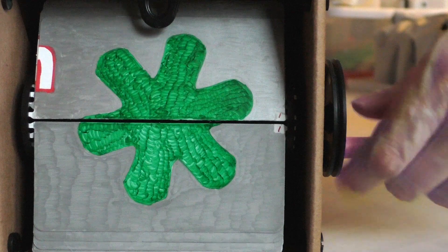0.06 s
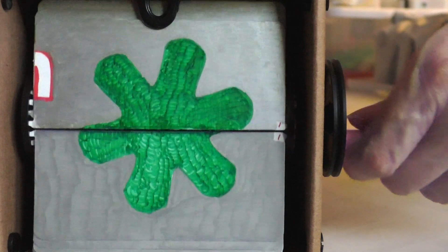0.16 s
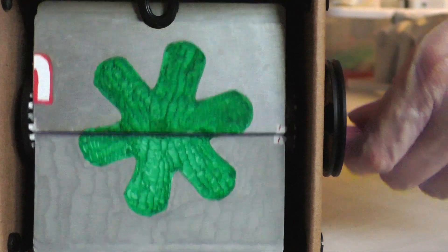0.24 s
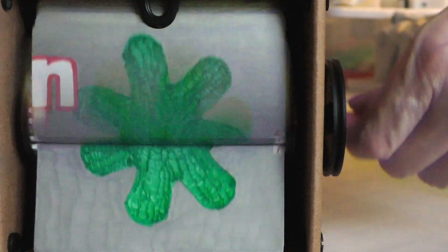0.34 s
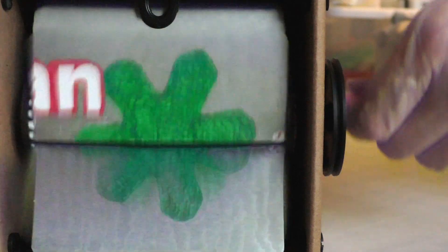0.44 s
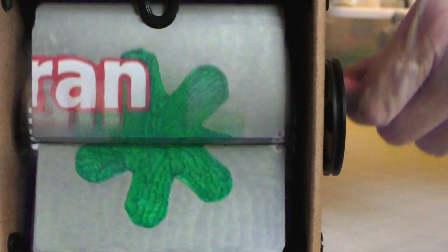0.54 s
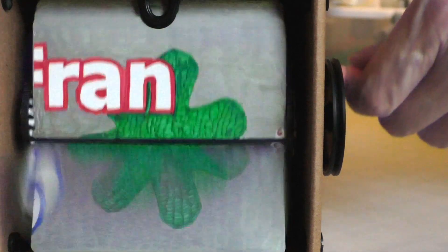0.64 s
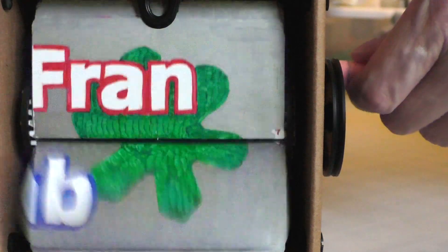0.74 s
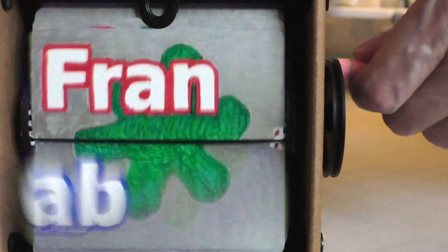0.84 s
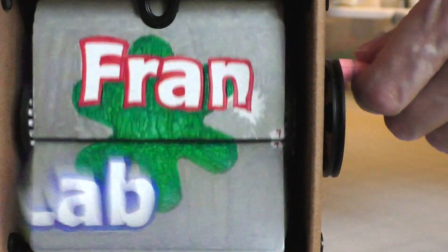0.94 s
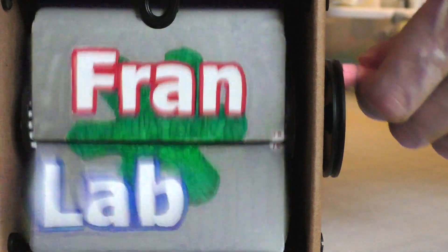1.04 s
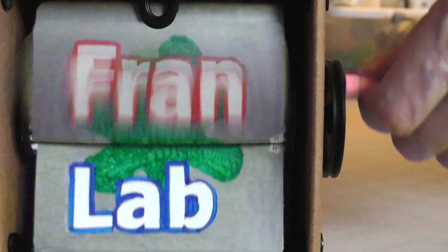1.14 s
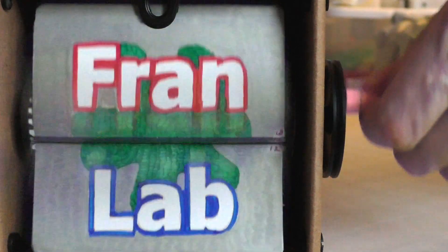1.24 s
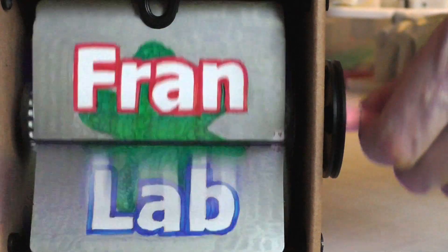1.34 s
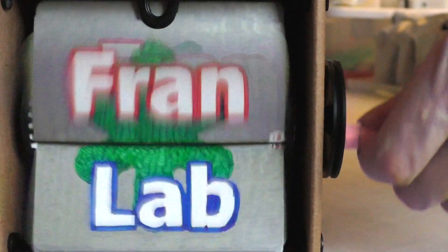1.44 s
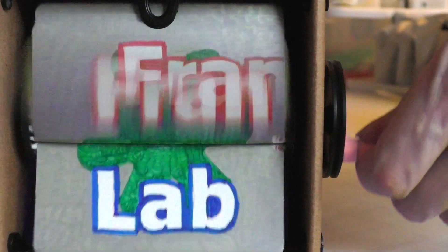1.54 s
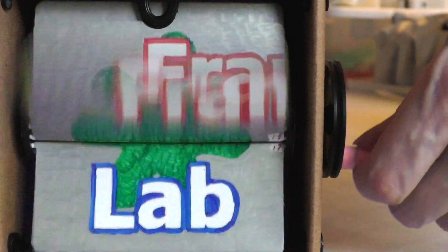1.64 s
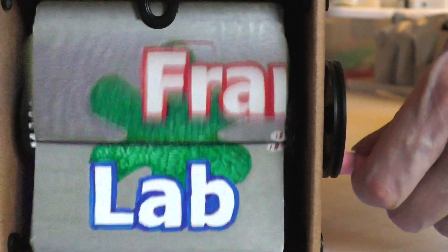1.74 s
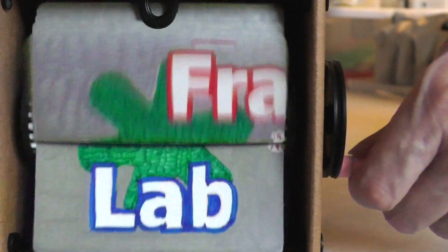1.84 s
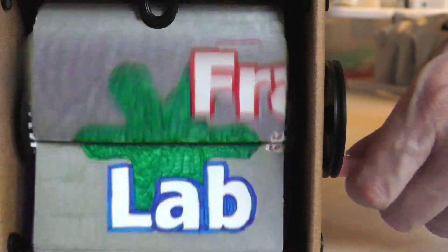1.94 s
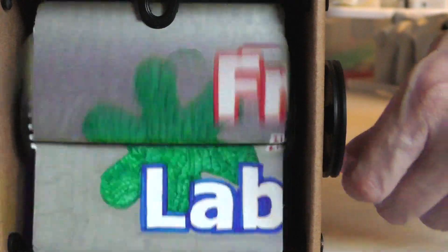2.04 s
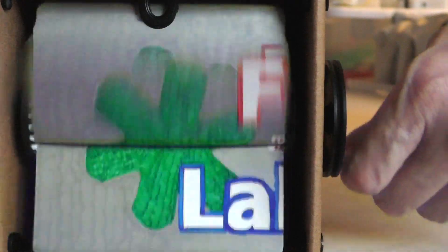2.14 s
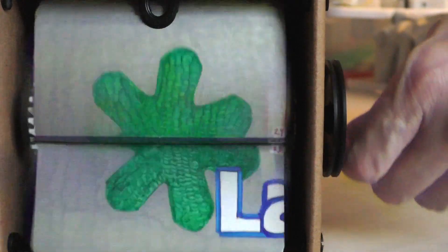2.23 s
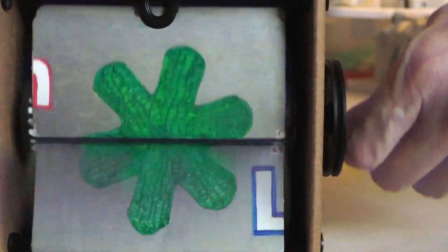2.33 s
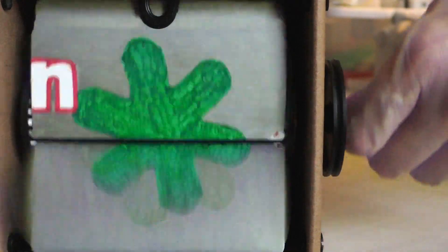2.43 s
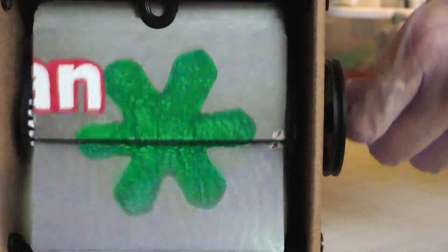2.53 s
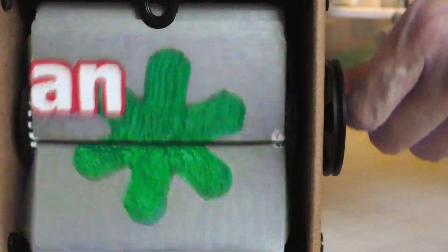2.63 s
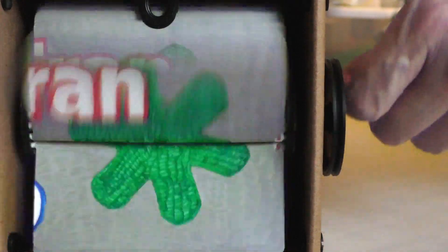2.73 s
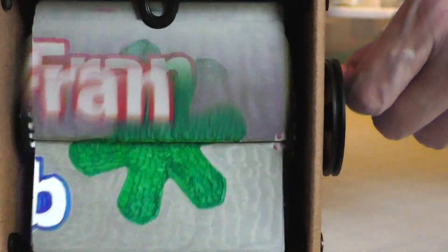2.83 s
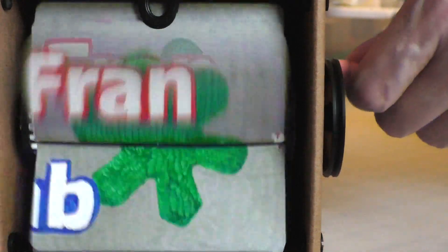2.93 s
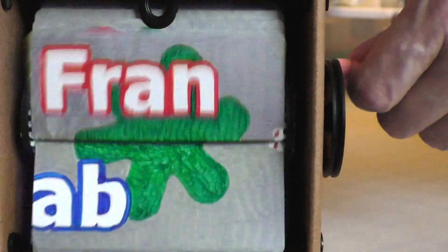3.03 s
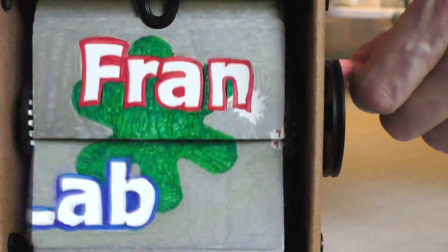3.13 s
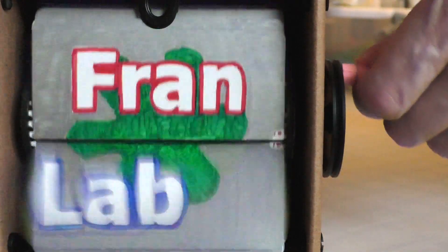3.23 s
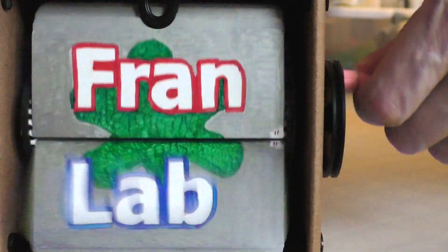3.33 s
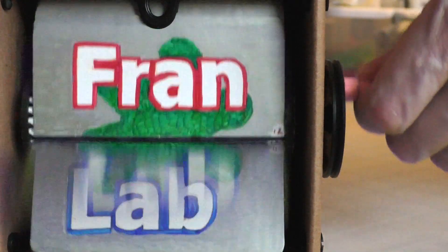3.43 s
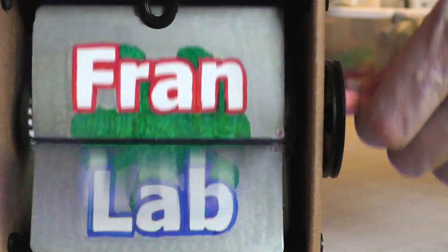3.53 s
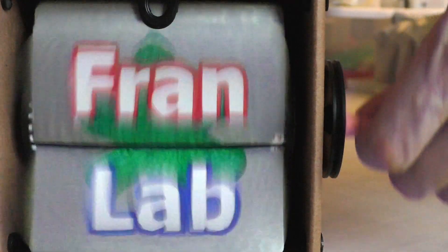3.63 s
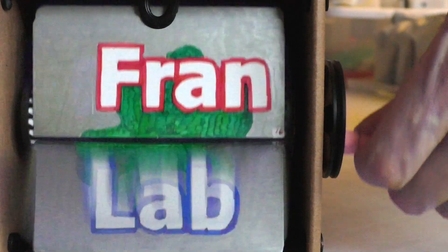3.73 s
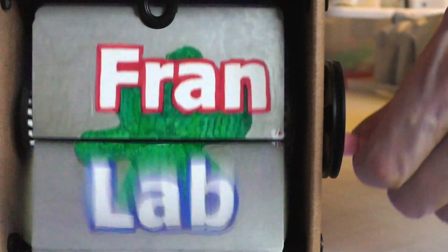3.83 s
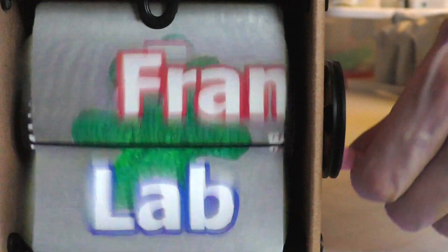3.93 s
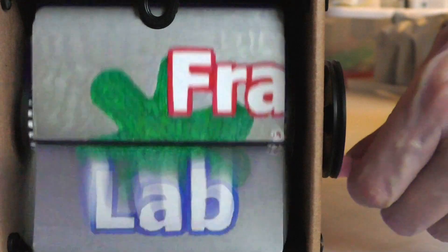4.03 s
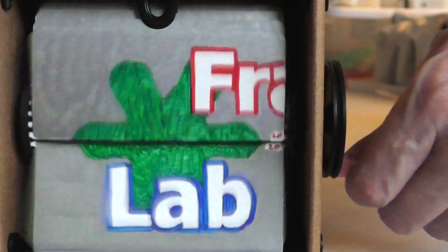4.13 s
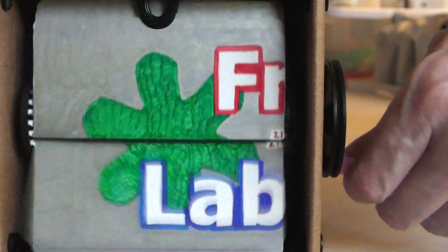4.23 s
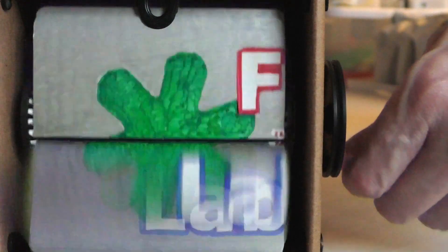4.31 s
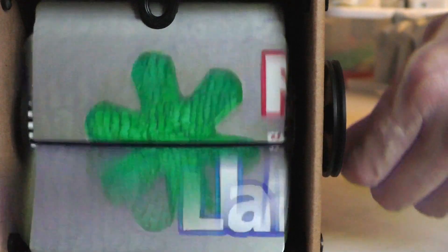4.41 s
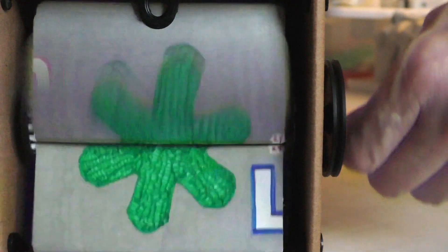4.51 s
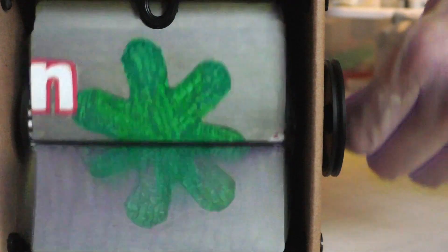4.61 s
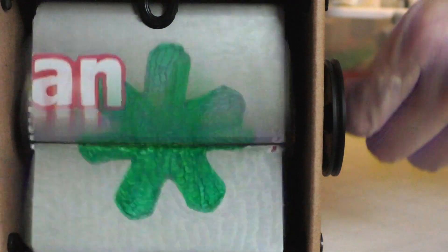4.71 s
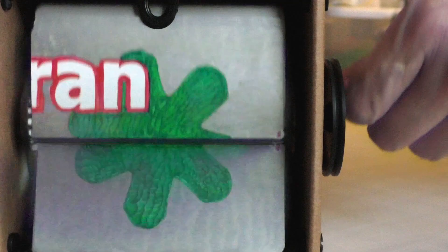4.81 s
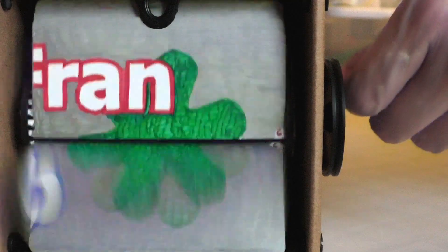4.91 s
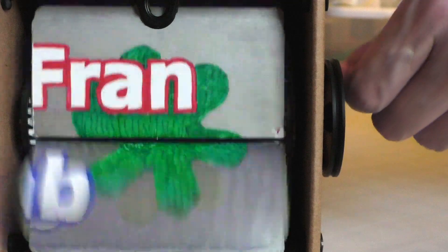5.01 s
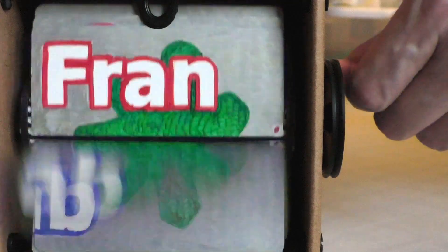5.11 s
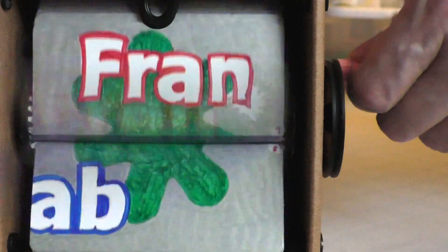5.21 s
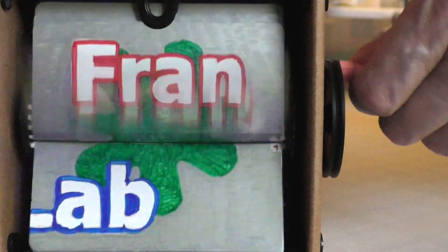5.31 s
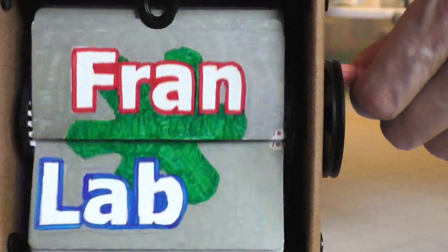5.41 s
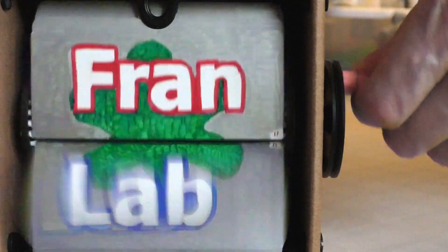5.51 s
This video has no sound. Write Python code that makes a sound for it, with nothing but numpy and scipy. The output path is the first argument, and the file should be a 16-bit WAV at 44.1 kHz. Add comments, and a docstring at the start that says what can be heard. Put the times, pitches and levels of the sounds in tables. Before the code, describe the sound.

The sound fades in from silence over the first 0.2 seconds. A soft, wavering low shudder at 0.15-0.35 s accompanies light scuffs and ticks as the hand starts the drum. Weak slaps at about 0.4 and 0.45 s lead to a firm crack at 0.5 s, then stiff cards keep slapping down until the end near 5.5 s, usually 0.05-0.12 s apart and never quite regular. Each is a very short, dry, bright snap with its own pitch, followed by a tiny clatter and a brief low knock from the box. Slaps soften somewhat around 2.75-2.95 s, then a slight gap precedes a strong one at 3.12 s. They crowd closer around 3.7-4.2 s; another gap comes before 5.27 s. Random fine ticks, papery rubbing and grainy hiss fill the spaces above quiet low rumble and faint hum. Close microphone, small room, short tail, slightly hollow colour.

```python
"""A small split-flap drum is cranked by hand, close by and indoors: noise bursts crack, tick and clatter.
Each stiff card slips off its catch, slaps the stack, clatters and knocks the box, which rings as fading cosines.
Between slaps, filtered noise makes the cards rub and rustle. A wavering tone shudders at the start.
Low noise rumbles under a faint hum. The sound fades in, and a copy about 3 ms apart makes it slightly hollow.
Table levels are relative: each function trims its own layer, and the fade sets the final loudness."""
import sys
import numpy as np
from scipy import signal
from scipy.fft import rfft, irfft
from scipy.io import wavfile

SR = 44100
rng = np.random.default_rng(int(sys.argv[2]) if len(sys.argv) > 2 else 0)


def output_pcm(signal):
    """Save a mono or channel-first signal as 16-bit PCM at the path in sys.argv[1].

    Samples are clipped to [-1, 1] before scaling.
    """
    pcm = np.clip(np.atleast_2d(signal).T, -1, 1) * 32767
    wavfile.write(sys.argv[1], SR, np.round(pcm).astype(np.int16))


N = 245195  # length in samples
SIZE = 2 ** 18  # samples per Fourier transform
HZ, TIME = np.fft.rfftfreq(SIZE, 1 / SR), np.arange(N) / SR
EDGE_HZ = 15850  # upper limit of the sound


def amp(db):
    """Turns decibels into a gain."""
    return 10 ** (np.asarray(db) / 20)


def unit(x):
    """Scales a signal to an average (rms) strength of 1."""
    return x / np.sqrt(np.mean(x ** 2) + 1e-20)


def read(points, hz=HZ):
    """Reads between the points of a table on a logarithmic pitch scale."""
    table_hz, value = np.transpose(points)
    return np.interp(np.log(hz + 1), np.log(table_hz), value)


def add(mix, s, sound):
    """Mixes a sound in, starting at time s."""
    part = mix[round(s * SR):][:len(sound)]
    part += sound[:len(part)]


def filtered(x, response):
    """Multiplies the spectrum of a sound by a frequency response."""
    return irfft(rfft(x, SIZE) * response)[..., :N]


def causal(db):
    """Makes a response of unit power with the given dB shape that rings only after its input."""
    log_gain = np.log(unit(amp(db)))
    mirrored = np.r_[log_gain, log_gain[-2:0:-1]]
    return np.exp(np.conj(signal.hilbert(mirrored)))[:len(db)]


def colour(x, db):
    """Gives a sound a dB shape over frequency."""
    return filtered(x, causal(db))


def drift(rate_hz):
    """Makes slow random motion of rms 1, with little movement faster than rate_hz."""
    return unit(filtered(rng.standard_normal(SIZE), 1 / (1 + (HZ / rate_hz) ** 4)))


def tilt(hz, bright):
    """A dB slope that trades the middle for the treble and leaves the low body alone."""
    return read([(800, 0), (1600, -bright), (12000, bright)], hz)


def bump(hz, centre, width):
    """The shape of a resonance, 1 at its centre."""
    return 1 / (1 + (2 * (hz - centre) / width) ** 2)


# noise of the turning drum as the hand presses harder or eases: (time_s, rubbing_db, hiss_db, rumble_db)
DRUM_NOISE = [(.15, -60, -65, 5), (.31, -55, -55, 3.5), (.43, -45, -48.5, 6), (.6, -50, -43, 1.5),
              (.88, -51.5, -50, 0), (1.02, -50.5, -50, 1.5), (1.25, -44, -47, 3), (1.55, -49.5, -49, 1),
              (1.9, -48.5, -45, 0.5), (2.2, -53, -50.5, -2.5), (2.7, -54.5, -51, 0), (3.1, -49, -48.5, 0),
              (3.35, -50, -50, -1), (3.75, -47.5, -44, 2.5), (4.33, -52, -52, 0), (4.8, -47.5, -41, 1),
              (5.05, -51.5, -53, -0.5), (5.55, -52.5, -50, 0.5)]
# colour of the rubbing cards and axle: (frequency_hz, relative_level_db)
RUB_COLOUR = [(150, -21), (400, -17.5), (700, -3.5), (900, -12.5), (1250, -8.5), (1700, 1), (1900, 1.5),
              (2150, 5.5), (2450, 0), (2900, -8), (4000, -6.5), (8000, -53)]


def rustle(rub_db=-2.24, hiss_db=-3.5, rub_lumps_db=3.0, hiss_lumps_db=3.0, catch_db=2.23,
           flight_s=0.017, flight_width_s=0.0074, flight_db=-3):
    """Sliding contact makes dull rubbing and a grainy hiss that catch unevenly and ease while a card falls."""
    s, rub, hiss, _ = np.transpose(DRUM_NOISE)
    # a smooth hump centred flight_s before each slap
    falling = sum(np.exp(-((TIME - slap[0] + flight_s) / flight_width_s).clip(-6, 6) ** 2 / 2)
                  for slap in SLAPS)
    contact_db = flight_db * falling + catch_db * drift(7.2)
    lumpy_noise = rng.standard_normal(N) * amp(rub_lumps_db * drift(54))
    rubbing = unit(colour(lumpy_noise, read(RUB_COLOUR)))
    graininess_db = hiss_lumps_db * drift(150) + 2.26 * drift(80)
    grains = unit(rng.standard_normal(N) * amp(graininess_db))
    return (rubbing * amp(np.interp(TIME, s, rub) + rub_db + contact_db),
            grains * amp(np.interp(TIME, s, hiss) + hiss_db + contact_db))


# colour of the low rumble of the drum and room: (frequency_hz, relative_level_db)
RUMBLE_COLOUR = [(20, -18), (50, -34), (90, -10), (135, 0.5), (185, 8), (240, -0.5), (290, -14.5),
                 (380, -11.5), (490, -6.5), (570, -21), (670, -7), (900, -25.5), (1060, -16), (2500, -41)]


def background(murmur_db=-46.0, hum_db=-55.0, hum_hz=120, apart_db=-18, lumps_db=3.5, waver_db=2):
    """Low noise rumbles unevenly, nearly alike in both ears, and a low hum swells with it."""
    s, *_, rumble = np.transpose(DRUM_NOISE)
    swell = amp(np.interp(TIME, s, rumble))
    lumps = unit(amp(lumps_db * drift(38.6)))
    common, apart = colour(rng.standard_normal((2, N)) * swell * lumps, read(RUMBLE_COLOUR))
    rumbling = common + amp(apart_db) * np.array([apart, -apart])
    tone = np.sqrt(2) * np.sin(2 * np.pi * hum_hz * TIME + 0.48 * drift(1.1))
    hum = tone * swell * amp(waver_db * drift(3.7))
    return amp(murmur_db) * rumbling + amp(hum_db) * hum


def shudder(start_s=0.15, length_s=0.21, level_db=-38.5, pitch_hz=129.3, wander_hz=20):
    """The hand sets the drum going and the box shudders: one low tone of wandering pitch swells and fades."""
    out, swell = np.zeros(N), np.hanning(round(length_s * SR))
    cycles = np.cumsum(pitch_hz + wander_hz * drift(42)[:len(swell)]) / SR
    add(out, start_s, amp(level_db) * swell * unit(np.sin(2 * np.pi * cycles)))
    return out


# a card drags briefly along its neighbour or the frame: (middle_s, half_length_s, level_db, pitch_hz)
SCUFFS = [(0.232, 0.025, -49, 2020), (0.374, 0.042, -45.5, 2940), (0.449, 0.037, -42.5, 2220),
          (0.889, 0.037, -52, 5600), (1.03, 0.024, -41, 2040), (3.054, 0.031, -48, 4230),
          (3.281, 0.026, -44, 2130), (5.147, 0.013, -44.5, 3970), (5.181, 0.021, -40.5, 3940)]


def scuffs(scuff_db=-1, width_hz=600):
    """Dragging cards hiss: noise rings in one narrow resonance, swelling and fading."""
    out = np.zeros(N)
    for s, half_length, db, hz in SCUFFS:
        noise = rng.standard_normal(SR // 10)
        tone = unit(signal.lfilter(*signal.iirpeak(hz, hz / width_hz, SR), noise))
        stroke = np.hanning(round(2 * half_length * SR))[:len(tone)]
        add(out, s - half_length, amp(db + scuff_db) * stroke * tone[:len(stroke)])
    return out


def crack(tint, fall_s, skirt, skirt_s, rise_s, snap=2.43, snap_s=0.00086, snap_hz=8000, grain_db=2.0):
    """A burst of tiny uneven contacts, brightest in its first instant, with a softer skirt."""
    t = np.arange(1024) / SR
    hz = np.fft.rfftfreq(len(t), 1 / SR)
    signs = rng.choice([-1., 1.], len(t))
    contacts = (1 - np.exp(-t / rise_s)) * signs * amp(grain_db * rng.standard_normal(len(t)))
    burst = rfft(contacts * (np.exp(-t / fall_s) + skirt * np.exp(-t / skirt_s)))
    treble = hz ** 2 / (hz ** 2 + snap_hz ** 2)
    burst += snap * rfft(contacts * np.exp(-t / snap_s)) * treble
    # the energy equals 175 samples (4 ms) at rms 1
    return unit(irfft(burst * causal(tint(hz)))) * np.sqrt(175 / len(t))


# a card edge slips or bounces, strongly or softly: (start_s, level_db)
TIMED_TICKS = [(0.2516, -34), (.2904, -36), (0.3395, -32.5), (.4652, -25.5), (.5315, -32.5), (.561, -23.5),
               (0.591, -29), (0.7474, -30), (.849, -41), (.8762, -36.5), (.9305, -32.5), (1.043, -34),
               (1.1342, -38), (1.196, -31.5), (1.2446, -27), (1.249, -36), (1.281, -28), (1.3235, -38),
               (1.4027, -32), (1.49, -30.5), (1.511, -31), (1.5584, -27.5), (1.7182, -29), (1.914, -38),
               (1.9395, -22.5), (2.0132, -36), (2.4078, -26.5), (2.636, -34.5), (2.6752, -30), (2.765, -25),
               (2.865, -33.5), (2.9106, -34), (2.934, -26), (3.0165, -35), (3.0488, -37), (3.136, -28),
               (3.341, -36), (3.4569, -25.5), (3.5713, -29), (3.6602, -36), (3.716, -33), (3.7724, -28),
               (3.7776, -30.5), (3.829, -25.5), (4.112, -25.5), (4.172, -38), (4.5127, -35), (4.587, -33.5),
               (4.6294, -22), (4.6647, -39), (4.7864, -32), (4.9082, -30), (5.035, -31.5), (5.0654, -32),
               (5.148, -40), (5.1758, -38.5), (5.3694, -29.5), (5.5294, -36.5)]


def ticks(tick_db=-1, bright_db=0.5, vary_db=2.0, random_per_s=8, random_db=-34, spread_db=4.5,
          release_s=0.0195, release_jitter_s=0.0016, release_db=-48):
    """Card edges touch briefly: ticks at set times, one per card release, and others at random times."""
    out, first_slap_s = np.zeros(N), SLAPS[0][0]
    chance = rng.standard_normal((200, 4))
    # typical gap 1 / random_per_s, varied by chance
    random_times = first_slap_s + np.cumsum(np.exp(.5 * chance[:, 0])) / random_per_s
    random_ticks = zip(random_times, random_db + spread_db * chance[:, 1])
    # each card ticks as it leaves the catch, one short fall before its slap
    releases = [(slap[0] - release_s + release_jitter_s * late, release_db + spread_db * level)
                for slap, (late, level) in zip(SLAPS, chance[:, 2:])]
    for s, db in [*TIMED_TICKS, *releases, *random_ticks]:
        bright = bright_db + vary_db * rng.standard_normal()
        sound = crack(lambda hz: tilt(hz, bright), fall_s=0.0015, skirt=0.36, skirt_s=0.0032, rise_s=0.00063)
        add(out, s, amp(db + tick_db) * sound)
    return out


# a card slaps down; pitch is the card's own and lift is how far it stands out:
# (start_s, level_db, fall_s, brightness_db, pitch_hz, lift_db, clatter_db, housing_knock_db)
SLAPS = [(0.391, -30.5, 0.00062, -5, 3500, 16, -42, -34.5), (0.4469, -25.5, .0015, -1, 5870, 17, -36, -42),
         (0.5034, -15.5, 0.00052, -2, 3080, 5, -42, -45),
         (0.5783, -20.5, 0.0019, -2.5, 1530, 3.5, -34, -28.5),
         (0.633, -15, 0.00071, 2, 4630, 15, -41, -40.5), (.695, -16, 0.00042, 2.5, 5870, 4, -35, -29.5),
         (0.7778, -20.5, 0.004, 4, 2700, 8, -31, -54), (.963, -18.5, 0.0007, 0, 1520, 6, -44, -32),
         (1.058, -15, 0.0016, 2.5, 2270, 8, -34.5, -38), (1.1601, -21, 0.0018, -4, 2620, 6, -31.5, -37),
         (1.2341, -20.5, 0.0013, 1.5, 3800, 10, -30, -38),
         (1.3115, -19.5, 0.0014, 2.5, 3730, 10, -29.5, -35),
         (1.3932, -19.5, 0.0015, -1, 2580, 13.5, -31.5, -30),
         (1.4845, -24, 0.00055, -1, 4200, 11, -33, -30.5),
         (1.5446, -17.5, 0.00084, -1.5, 6630, 5, -39, -28.5),
         (1.6234, -21.5, 0.0014, 7.5, 4400, 14, -31, -32.5),
         (1.7107, -19.5, 0.00084, 2, 3620, 9.5, -36.5, -36),
         (1.8155, -17.5, 0.0021, 2.5, 3350, 6, -36.5, -50.5), (1.9306, -20, .0009, -6.5, 2220, 2, -36, -31),
         (2.0337, -16.5, 0.0004, 3, 4580, 3, -35, -35.5),
         (2.1353, -21.5, 0.0066, 4.5, 5200, 2, -35.5, -37.5),
         (2.222, -19.5, 0.001, 4.5, 3880, 13.5, -33, -47),
         (2.3215, -21.5, 0.0036, 4, 1890, 19.5, -38, -34.5),
         (2.3917, -19.5, 0.00083, -0.5, 3830, 5.5, -36, -35),
         (2.4856, -21, 0.0024, -3.5, 1600, -0.5, -30, -38), (2.5679, -19, 0.0052, -4, 9000, 15, -32.5, -43),
         (2.663, -21.5, 0.0017, -1, 2240, 6, -37, -35), (2.7575, -28.5, 0.002, -2.5, 1654, 9, -42, -35.5),
         (2.834, -23, .0006, -2.5, 2400, 12, -30.5, -33), (2.926, -23, 0.002, -3, 7750, 2, -36, -47),
         (3.1239, -16, 0.0015, 1.5, 3300, 6, -39, -36), (3.2458, -16, 0.0016, 5.5, 1710, 17, -33, -31.5),
         (3.3618, -18.5, .0009, -4.5, 7850, 8, -35, -41), (3.4614, -20, .0005, 0, 7360, 11, -42.5, -33.5),
         (3.5884, -18.5, 0.001, 1, 4420, 9, -32, -30.5), (3.6864, -20.5, 0.0022, -2, 2780, 12, -29.5, -34),
         (3.7642, -21, 0.00074, 1, 5660, 9, -41, -35), (3.8153, -18, .0014, 5, 1950, 2, -32.5, -36),
         (3.873, -18.5, .0018, 2, 4600, 7, -31, -34), (3.9493, -20, 0.00048, -2.5, 7360, 14, -33.5, -35.5),
         (4.0455, -18, 0.001, 3, 5400, 12.5, -37, -31.5), (4.098, -18.5, 0.001, 2, 3900, 13.5, -33.5, -32),
         (4.1585, -18.5, 0.0013, 8, 4830, 6, -34, -35.5), (4.2348, -22.5, 0.0027, 4.5, 1780, 14, -38, -35),
         (4.3365, -21.5, 0.00051, -4, 5510, 6.5, -31, -61), (4.4588, -18, .0006, 0, 3030, 8.5, -30, -36),
         (4.56, -18.5, 0.0014, 1.5, 1410, 8.5, -29.5, -32.5),
         (4.6127, -15.5, 0.0018, -1, 1580, -4, -31, -32), (4.6997, -17.5, 0.00088, 4, 1380, 13, -32.5, -32),
         (4.7605, -22, 0.00083, -5, 7350, 20, -37, -40), (4.8316, -19, 0.00075, -2, 2820, 5, -35, -41),
         (4.897, -22.5, 0.00055, -4.5, 9600, 13, -40, -32.5),
         (4.973, -21.5, 0.00044, 2.5, 1600, 10, -37.5, -30.5), (5.055, -23, 0.0017, 3, 3900, 9, -35.5, -39),
         (5.2655, -15.5, 0.0018, 2, 2200, 6, -40.5, -31), (5.387, -18.5, 0.0018, -2.5, 2300, 7.5, -34, -32),
         (5.4952, -18.5, 0.00033, -3.5, 10100, 11, -35, -36.5)]


def slaps(slap_db=-2.79, ring_width_hz=520, stray_db=3, stray_hz=900, scrape_db=-12, scrape_s=0.0016,
          clatter_db=-2, bounce_s=0.0089, spread_s=0.0097, lumpy_db=4):
    """Each card scrapes off its catch, cracks with its own pitch and three chance ones, then clatters."""
    out, friction, t = np.zeros(N), np.zeros(N), np.arange(SR // 20) / SR
    strays = 2000 * 2 ** rng.uniform(0, 2.5, (len(SLAPS), 3))  # chance pitches in Hz
    for (s, db, fall_s, bright, pitch, lift, clatter, _), others in zip(SLAPS, strays):
        def tint(hz):
            """The card's colour: brightness, own pitch and chance pitches."""
            chance_rings = stray_db * sum(bump(hz, other, stray_hz) for other in others)
            return tilt(hz, bright) + lift * bump(hz, pitch, ring_width_hz) + chance_rings
        add(out, s, amp(db + slap_db) * crack(tint, fall_s, skirt=0.18, skirt_s=0.0047, rise_s=0.00028))
        # the scrape swells up to the slap; the clatter peaks bounce_s after it
        add(friction, s - t[-1], amp(db + scrape_db) * np.exp(-(t[::-1] / scrape_s) ** 2 / 2))
        add(friction, s, amp(clatter + clatter_db) * np.exp(-((t - bounce_s) / spread_s) ** 2 / 2))
    lumpy_noise = unit(rng.standard_normal(N) * amp(lumpy_db * drift(330)))
    return out + friction * lumpy_noise


# ways the housing rings; t60 is the time to fade by 60 dB: (pitch_hz, level_db, t60_s)
HOUSING_MODES = [(189.8, -1, 0.098), (229, -35, 0.038), (160, -7.5, 0.1), (363, -18, 0.1), (482, -20, 0.2),
                 (629, -7.5, 0.031)]


def housing(knock_db=4.5, late_s=0.00028, rise_s=0.0021):
    """Every slap pushes the box, which swings up quickly and rings low and briefly."""
    blows, t = np.zeros(N), np.arange(SR // 4) / SR
    for s, *_, knock in SLAPS:
        add(blows, s + late_s, amp([knock + knock_db]))
    ring = sum(amp(db - 60 * t / t60) * np.cos(2 * np.pi * hz * t) for hz, db, t60 in HOUSING_MODES)
    swing = signal.oaconvolve(blows, ring * (1 - np.exp(-t / rise_s)))[:N]
    return filtered(swing, HZ ** 2 / (HZ ** 2 + 70 ** 2))  # the knocks carry little deep bass below about 70 Hz


# air moved by a falling card reaches the microphone: (start_s, peak_db)
PUFFS = [(0.503, -35), (.634, -19.5), (.695, -24), (1.545, -16.5), (2.034, -36), (4.045, -32), (4.103, -40),
         (4.613, -29), (5.266, -35)]


def puffs(width_s=0.001, late_s=0.0019, puff_db=-4):
    """A fast card makes a short, smooth dip in air pressure."""
    out, t = np.zeros(N), np.arange(SR // 50) / SR
    for s, db in PUFFS:
        add(out, s, -amp(db + puff_db) * np.exp(-((t - late_s) / width_s) ** 2 / 2))
    return out


# how long the room takes to fade by 60 dB: (frequency_hz, t60_s)
ROOM_DECAY = [(200, 0.43), (1500, 0.22), (5000, 0.13), (15000, 0.044)]
# left-right width of the near reflections: (frequency_hz, side_level_db)
NEAR_WIDTH = [(100, -30), (350, -15), (1300, -10), (2500, -23), (5000, -20.5), (10000, -68), (13500, -15)]


def room(x, wet_db=-16.5, side_db=-8):
    """Walls return a short diffuse tail, mostly central, and near reflections that differ left to right."""
    hz, t, z = signal.stft(rng.standard_normal((2, SR // 2)), SR, nperseg=256)
    decay = amp(-60 * t / read(ROOM_DECAY, hz)[:, None])
    tails = signal.istft(z * decay, SR, nperseg=256)[1]
    t = np.arange(tails.shape[1]) / SR
    tails = tails * (1 - np.exp(-t / 0.00011))
    near = rng.standard_normal(len(t)) * t * np.exp(-t / .002)
    mid, side, close = (signal.oaconvolve(x, echo / np.linalg.norm(echo))[:N] for echo in (*tails, near))
    side = amp(wet_db + side_db) * side + filtered(close, amp(read(NEAR_WIDTH)))
    return x + amp(wet_db) * mid + np.array([side, -side])


# colour of a struck card: (frequency_hz, relative_level_db)
CARD_COLOUR = [(60, -41), (300, 0), (480, 0.5), (720, 0.5), (900, -12.5), (1150, -8.5), (1450, 3.5),
               (2000, -5), (3000, -2.5), (4500, -2.5), (6500, 0), (10000, 1.35), (12500, 0.84),
               (15500, -1.5)]
# resonances of the cards and their frame: (pitch_hz, width_hz, lift_db)
CARD_RINGS = [(1702, 233, 10), (2446, 420, 11), (2820, 49, 4), (3668, 690, 8.5), (5395, 725, 13),
              (7650, 330, 6.5), (9470, 790, 4.5), (12040, 650, 4)]


def scene(hiss_ring=0.59):
    """Blows ring the cards fully, sliding stirs their resonances less; the room surrounds them."""
    rubbing, hiss = rustle()
    card_db = read(CARD_COLOUR) - 40 * (HZ > EDGE_HZ + 1000)
    ring_db = sum(db * bump(HZ, hz, width) for hz, width, db in CARD_RINGS)
    struck = colour(slaps() + ticks(), card_db + ring_db)
    sliding = colour(hiss, card_db + hiss_ring * ring_db)
    in_room = room(struck + sliding + rubbing + scuffs() + housing())
    return in_room + puffs() + shudder() + background()


# time between the two copies of the sound: (frequency_hz, delay_ms)
DOUBLING_DELAY = [(660, 3.03), (1020, 2.94), (1450, 2.78), (1750, 2.857), (2130, 2.82), (2760, 2.899),
                  (3480, 2.874), (5190, 2.89), (7520, 2.926), (9800, 2.959), (12500, 2.96), (15580, 2.9525)]
# stereo balance: (frequency_hz, left_minus_right_db)
BALANCE = [(60, 0), (170, -.8), (350, .5), (700, 1.4), (1400, 1), (3000, .7), (5500, 0), (13000, .3)]
# the sound fades in: (time_s, gain_db)
FADE_IN = [(0, -94), (.09, -43), (.12, -14), (.16, -2.5), (.22, 3.5)]


def record(dry, lead=0.45):
    """A weaker copy runs about 3 ms ahead and combs the spectrum; then balance, fade-in and band limit."""
    doubling = 1 + lead * np.exp(2j * np.pi * HZ * read(DOUBLING_DELAY) / 1000)
    balance = amp(np.outer([.5, -.5], read(BALANCE)))
    fade = amp(np.interp(TIME, *np.transpose(FADE_IN)))
    sound = filtered(dry, doubling * balance) * fade
    low_pass = signal.firwin(255, EDGE_HZ, window=("kaiser", 8), fs=SR)
    return signal.oaconvolve(sound, low_pass[None], "same")


dry = scene()
out = record(dry)
output_pcm(out)
```